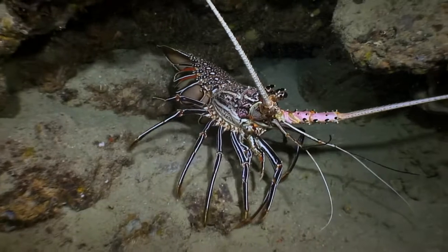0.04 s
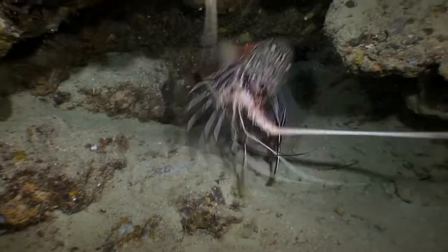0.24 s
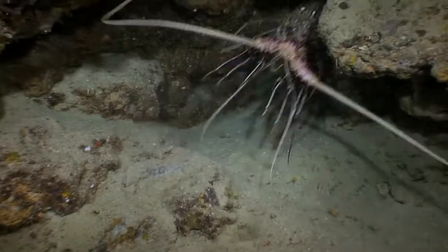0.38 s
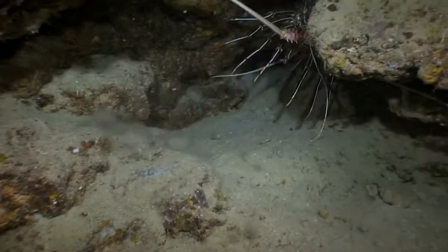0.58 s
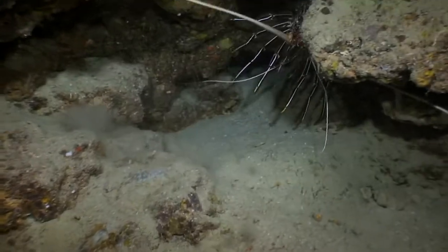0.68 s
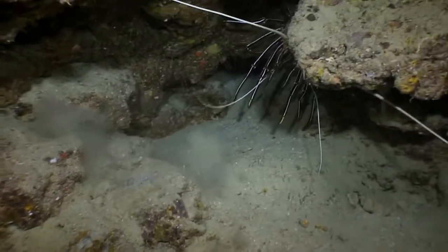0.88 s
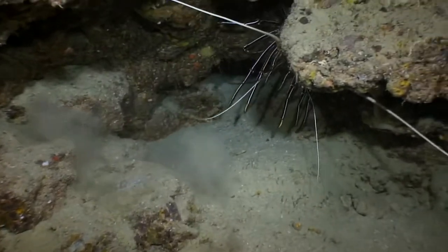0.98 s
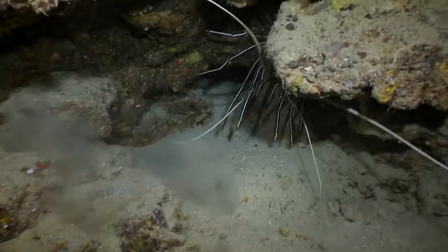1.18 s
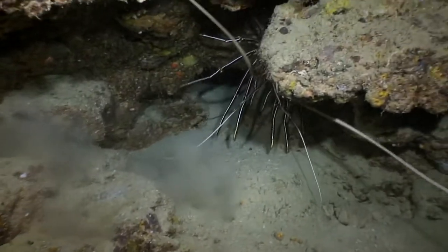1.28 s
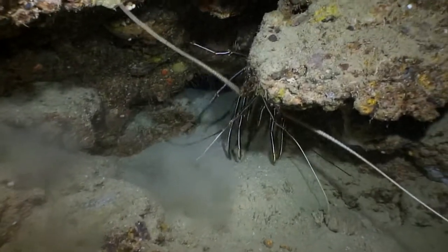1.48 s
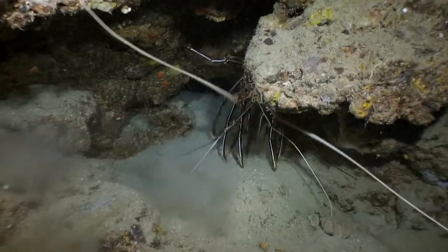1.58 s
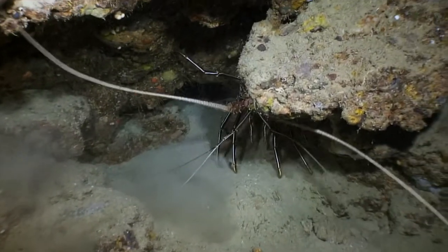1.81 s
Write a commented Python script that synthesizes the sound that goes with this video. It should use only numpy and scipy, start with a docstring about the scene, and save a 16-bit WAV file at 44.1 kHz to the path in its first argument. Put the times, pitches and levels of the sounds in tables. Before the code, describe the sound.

Close to an underwater camera, a spiny lobster makes one quick, creaky rasping burst. Light shell knocks, a brief scrape and rustling sand follow, over scattered reef clicks, gentle hiss and a faint electronic whine.

```python
"""A spiny lobster under water

The lobster rasps: its antenna bases stick and slip over ridged files, and each slip rings the shell.
It darts under a reef ledge, knocks and scrapes on the rock and stirs the sand and water.
Clicks come from the reef. Under it all lie a soft water hiss and the whine and buzz of a camera
in its housing."""
import sys
import numpy as np
from scipy import signal
from scipy.fft import rfft, irfft, next_fast_len
from scipy.io import wavfile
from scipy.ndimage import map_coordinates

SR = 44100
rng = np.random.default_rng(int(sys.argv[2]) if len(sys.argv) > 2 else 0)


def dump(signal):
    """Clip the signal to [-1, 1] and save it as 16-bit WAV at the path in sys.argv[1]."""
    limited = np.clip(np.atleast_2d(signal).T, -1, 1)
    pcm = np.round(limited * 32767).astype(np.int16)
    wavfile.write(sys.argv[1], SR, pcm)


N = 81585

# Antenna strokes: start_s, hardest_s, end_s, level_db, start_slips_per_s, hardest_slips_per_s,
# end_slips_per_s, pitch_ratio, treble_db, extra_grit_db
ANTENNA_STROKES = [(.2455, .2882, .3145, -3, 139, 188, 132, 1.04, -2, 4),
                   (.2351, .2807, .2985, -10, 143, 163, 92, 1.04, 0, 9),
                   (.3247, .3375, .3820, -.3, 146, 191, 126, .97, 2, 0)]
# Nearby reef clicks: start_s, level_db, pitch_hz
NEAR_CLICKS = [(.0370, -26, 4530), (.0906, -28.5, 2950), (.1806, -27, 4608), (.2198, -23, 2470),
               (.6066, -27, 4600), (.7125, -29, 2600), (.7869, -32, 2730), (.8117, -30.5, 2800),
               (.8350, -24.5, 2050), (.9435, -29.5, 4460), (1.050, -35, 4520), (1.166, -34.5, 4400),
               (1.1997, -19.5, 2450), (1.2045, -28, 2220), (1.2751, -30.5, 4700), (1.3303, -29, 5290),
               (1.4770, -28, 4550), (1.7132, -31.5, 4090), (1.7705, -31, 2820)]
# Knocks of the shell on rock: start_s, peak_db
ROCK_KNOCKS = [(0.5214, -29.5), (.5290, -32), (.5360, -27), (.5540, -19), (0.5567, -29.5), (0.651, -28),
               (.6532, -25), (0.666, -28), (.8630, -27), (0.8658, -27.5)]
# Gulps of stirred water: start_s, peak_db, pitch_hz
WATER_GULPS = [(.514, -42, 277), (0.644, -54, 270), (1.207, -46, 482), (1.210, -46.5, 280)]
# The camera's thin tones: pitch_hz, level_db, phase_jump_rad
WHINE_TONES = [(1597, -64, 0.29), (2400, -62.5, 0.66), (3173, -63.5, 1.1), (3960, -63.5, 0.18),
               (5625, -66, 0.33), (7752, -43.5, .05), (8570, -51.5, 2.4), (11530, -74.5, 1),
               (13668, -71, 1), (15488, -62, .2), (15504, -64, .2)]
# How loud the sand and legs rustle over time: time_s, level_db
RUSTLE_LEVELS = [(.49, -57), (.525, -47.5), (.58, -45), (.625, -50), (.665, -43.5), (.70, -56),
                 (.76, -55.5), (.81, -50), (.88, -50.5), (.93, -59), (1.0, -63), (1.04, -45), (1.09, -76)]
# How loud the shell scrapes over time: time_s, level_db
SCRAPE_LEVELS = [(.545, -46), (.556, -32), (.58, -38.5), (.605, -38.5), (.625, -51), (.67, -66)]

# A colour says how strong a sound is from low to high. The sea's hiss: pitch_hz, level_db
WATER_COLOUR = [(25, -0.5), (64, -3), (250, -1.5), (680, -2.5), (950, -6.5), (1250, -6), (1700, -10),
                (2600, -5.5), (3500, -8.5), (4500, -20), (7000, -25), (10000, -37), (16000, -17)]
# The camera's buzz: pitch_hz, level_db
BUZZ_COLOUR = [(200, -19), (700, 1.5), (1050, -14.5), (1700, 1.5), (3200, -2), (5500, -5), (7000, -8.5),
               (10000, -16.5), (12000, -10.5), (16000, -28)]
# The snap that starts a click: pitch_hz, level_db
SNAP_COLOUR = [(500, -29), (1300, -12), (2800, -4), (5000, -8), (7000, -13), (10000, -32), (16000, -40)]
# The shell ringing after one slip: pitch_hz, level_db
SHELL_COLOUR = [(60, -37.5), (300, -37.5), (680, -26.5), (930, -40), (1300, -22), (1900, -20), (2450, -3),
                (3050, -0.5), (3700, -9.5), (5000, -13.5), (5800, -17.5), (7500, -16.5), (8800, -24),
                (10800, -18.5), (13500, -31.5), (16000, -30.5)]
# Rustling sand and legs: pitch_hz, level_db
SAND_COLOUR = [(100, -18), (250, -6.5), (600, -10), (950, -26), (1800, -12), (2400, 0.5), (2900, -1.5),
               (3700, -8), (5000, -11), (8000, -17.5), (15000, -30)]
# The shell hitting rock: pitch_hz, level_db
KNOCK_COLOUR = [(100, -21), (600, -11.5), (950, -24), (1250, -8.5), (1900, -13), (2850, 5), (3700, -9),
                (5500, -14), (7500, -11.5), (9000, -32), (16000, -37)]
# The shell scraping along the ledge: pitch_hz, level_db
LEDGE_COLOUR = [(300, -29), (2000, -13), (2850, -2), (3700, -14), (5300, -14), (6300, -5), (6850, -6),
                (7200, 5), (7600, 2.5), (8100, -4), (8600, -17.5), (15000, -33)]


def amp(db):
    """Turn decibels into a number to multiply by."""
    return 10 ** (np.asarray(db) / 20)


def unit(x):
    """Scale a sound so its average power is 1."""
    return x / np.sqrt(np.mean(x ** 2) + 1e-20)


def gains(colour, size):
    """Join a colour's points into one gain for each frequency."""
    hz, db = np.transpose(colour)
    all_hz = np.fft.rfftfreq(size, 1 / SR)
    return amp(np.interp(np.log(all_hz + 1), np.log(hz + 1), db))


def coloured(x, colour):
    """Give a sound a colour, at average power 1."""
    return unit(irfft(rfft(x) * gains(colour, len(x)), len(x)))


def ring(colour, size=2048):
    """The ring of an object with this colour after one tap, with peak 1."""
    cepstrum = irfft(np.log(gains(colour, size)))
    # Folding the second half onto the first packs the sound right after the tap.
    cepstrum[1:size // 2] *= 2
    cepstrum[size // 2 + 1:] = 0
    ringing = irfft(np.exp(rfft(cepstrum)))
    return ringing / np.abs(ringing).max()


def burst(fade_s, size=4096):
    """A puff of noise with energy 1 that drops 60 dB in fade_s."""
    noise = rng.standard_normal(size) * amp(-60 * np.arange(size) / SR / fade_s)
    return noise / np.linalg.norm(noise)


def wobble(points_per_s):
    """A smooth curve through random points."""
    return map_coordinates(rng.standard_normal(256), [np.arange(N) * points_per_s / SR], mode="wrap")


def add(track, start_s, x):
    """Mix a sound into the track at start_s."""
    part = track[max(round(start_s * SR), 0):][:len(x)]
    part += x[:len(part)]


def with_tail(x, db, fade_s):
    """Give a sound a fresh tail of tiny random echoes."""
    tail = amp(db) * burst(fade_s)
    tail[0] += 1
    return signal.fftconvolve(x, tail)


def grains(levels, colour, grains_per_s):
    """Many tiny random ticks that swell and fade together."""
    ticks = rng.standard_normal(N) * (rng.random(N) < grains_per_s / SR)
    level_db = np.interp(np.arange(N) / SR, *np.transpose(levels), left=-120, right=-120)
    return amp(level_db) * coloured(ticks, colour)


def water_hiss():
    """The sea hisses softly, its level wavering a little."""
    return amp(-53 + 1.5 * wobble(8.69)) * coloured(rng.standard_normal(N), WATER_COLOUR)


def camera(frame_hz=30, buzz_hz=60):
    """Thin whines skip with every picture frame, and a hiss pulses with the electronics."""
    t, whine = np.arange(N) / SR, np.zeros(N)
    for hz, db, jump_rad in WHINE_TONES:
        phase = 2 * np.pi * (hz * t + rng.random())
        skip = jump_rad * (frame_hz * t % 1)
        whine += amp(db) * np.sqrt(2) * np.sin(phase + skip + .15 * wobble(22))
    pulse = unit(1 + .5 * np.sin(2 * np.pi * buzz_hz * t))
    return whine + amp(-52) * pulse * coloured(rng.standard_normal(N), BUZZ_COLOUR)


def reef_clicks(far_per_s=35, rise_s=.00024, tone_fade_s=.0081, snap_fade_s=.0086):
    """The reef clicks, a few times nearby and often far off: each is a snap and a short tone."""
    out, t = np.zeros(N), np.arange(2048) / SR
    far_clicks = [(when * N / SR, -38 + 6 * (strength - .5), 2200 * 2 ** octaves)
                  for when, strength, octaves in rng.random((int(far_per_s * N / SR), 3))]
    for start_s, db, hz in list(NEAR_CLICKS) + far_clicks:
        tone = np.sin(2 * np.pi * hz * t) * amp(-60 * t / tone_fade_s) * (1 - np.exp(-t / rise_s))
        snap = amp(-16.5 - 60 * t / snap_fade_s) * coloured(rng.standard_normal(len(t)), SNAP_COLOUR)
        add(out, start_s, amp(db) * with_tail(tone + snap, db=-4, fade_s=.017))
    return out


def antenna_rasp(rise_db=10, fall_db=17.5, treble_hz=7800, echo_s=.0012):
    """Each stroke speeds up and presses harder, then eases off; every slip rings the shell."""
    out = np.zeros(N)
    for start_s, hardest_s, end_s, db, *slip_rates, pitch_ratio, treble_db, grit_db in ANTENNA_STROKES:
        stroke, t = np.zeros(N), np.arange(start_s, end_s, 1 / SR)
        stages_s = [start_s, hardest_s, end_s]
        slip_count = np.cumsum(np.interp(t, stages_s, slip_rates)) / SR
        for slip_s in np.interp(np.arange(slip_count[-1]), slip_count, t):
            stage = np.interp(slip_s, stages_s, [-1, 0, 1])
            force_db = -(rise_db if stage < 0 else fall_db) * stage ** 2 + rng.normal(0, .5)
            bright_db = treble_db + .5 * force_db  # harder slips are brighter
            shell = ring([(hz * pitch_ratio, level_db + bright_db * min(hz / treble_hz, 1) ** 2)
                          for hz, level_db in SHELL_COLOUR])
            slip = amp(db + force_db) * with_tail(shell, db=grit_db - 12, fade_s=.0064)  # rough grit
            add(stroke, slip_s, with_tail(slip, db=-15.5, fade_s=.016))  # the shell's loose ring
            add(stroke, slip_s + echo_s, amp(-23) * slip)  # echo off the nearby rock
        out += with_tail(stroke, db=-10.5, fade_s=.021)[:N]  # the ledge scatters the sound
    return out


def sand_rustle():
    """Legs and stirred sand rustle as the lobster darts away."""
    return grains(RUSTLE_LEVELS, SAND_COLOUR, grains_per_s=1500)


def water_gulps(rise_s=.0048, fade_s=.062, sag_per_s=14.8):
    """Stirred water makes soft, low pulses that sag in pitch."""
    out, t = np.zeros(N), np.arange(SR // 6) / SR
    for start_s, db, hz in WATER_GULPS:
        phase = 2 * np.pi * np.cumsum(hz * np.exp(-sag_per_s * t)) / SR
        swell = (1 - np.exp(-t / rise_s)) ** 2 * amp(-60 * t / fade_s)
        add(out, start_s, amp(db) * swell / swell.max() * np.sin(phase))
    return out


def shell_knocks():
    """The shell hits the rock and rings briefly."""
    out, shell = np.zeros(N), ring(KNOCK_COLOUR)
    for start_s, db in ROCK_KNOCKS:
        knock = with_tail(shell, db=6, fade_s=.014)
        add(out, start_s, amp(db) * knock / np.abs(knock).max())
    return out


def shell_scrape():
    """The shell drags along the ledge with a bright, grainy scratch."""
    return grains(SCRAPE_LEVELS, LEDGE_COLOUR, grains_per_s=4000)


def scene():
    """Mix everything; the housing carries nearly the same sound to both microphones."""
    rasp = antenna_rasp()
    rest = water_hiss() + camera() + reef_clicks()
    rest += sand_rustle() + water_gulps() + shell_knocks() + shell_scrape()
    width = signal.fftconvolve(amp(-35) * rasp + amp(-49) * rest, burst(fade_s=.0048))[:N]
    return np.array([rasp + rest + width, rasp + rest - width])


def record(dry, top_hz=15830):
    """The camera keeps no sound higher than top_hz."""
    size = next_fast_len(N + 8192)
    kept = np.fft.rfftfreq(size, 1 / SR) < top_hz
    return irfft(rfft(dry, size) * kept, size)[:, :N]


dry = scene()
out = record(dry)
dump(out)
```